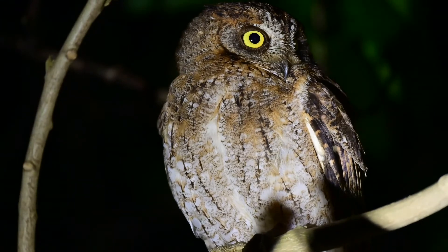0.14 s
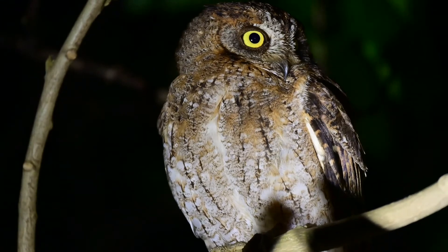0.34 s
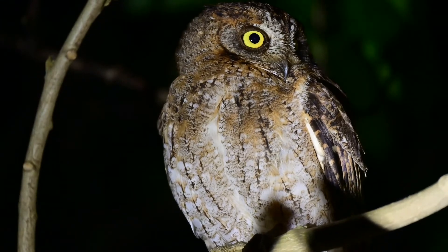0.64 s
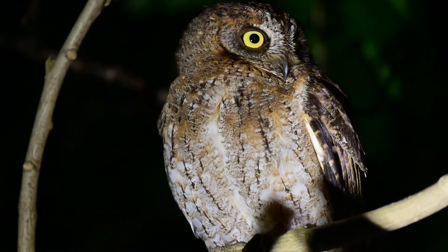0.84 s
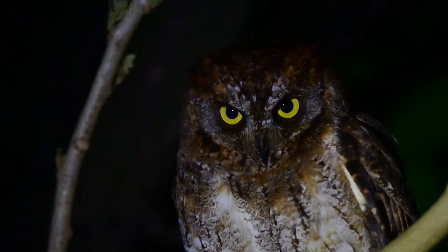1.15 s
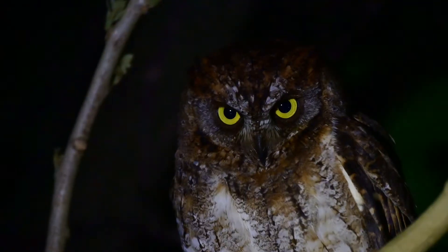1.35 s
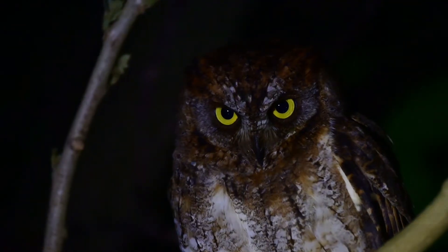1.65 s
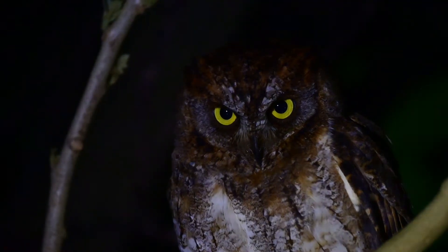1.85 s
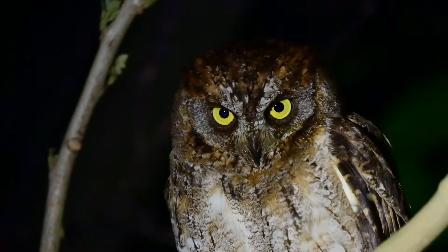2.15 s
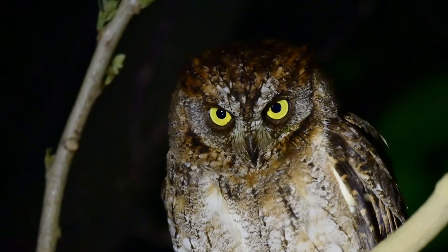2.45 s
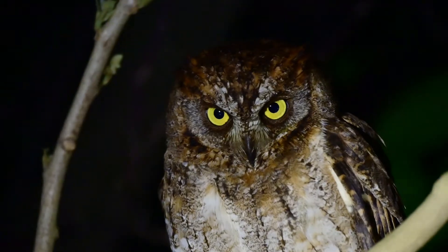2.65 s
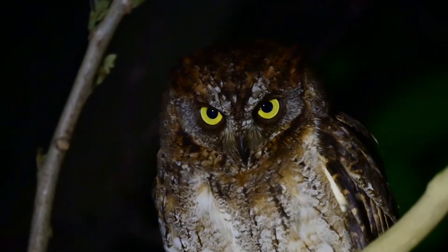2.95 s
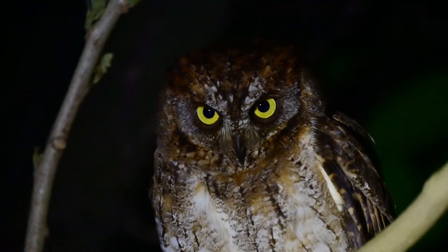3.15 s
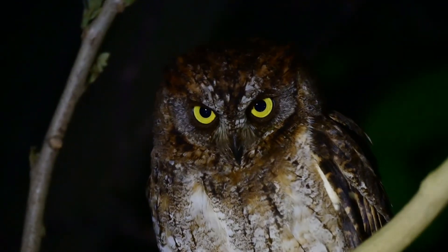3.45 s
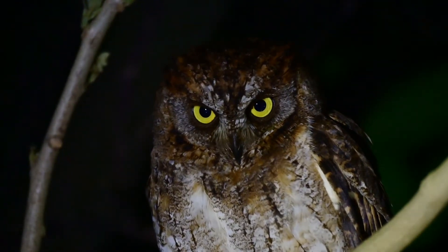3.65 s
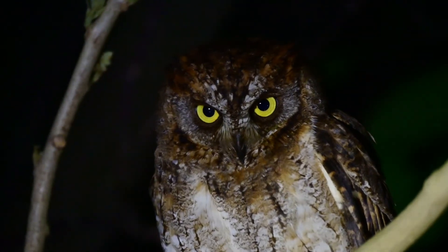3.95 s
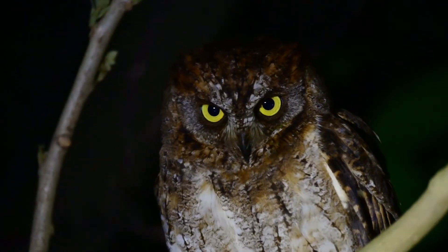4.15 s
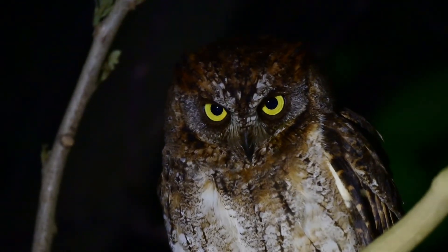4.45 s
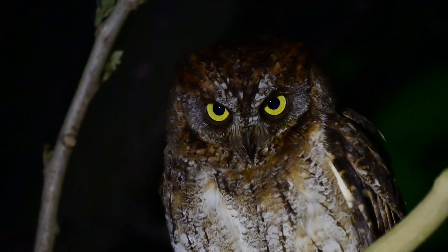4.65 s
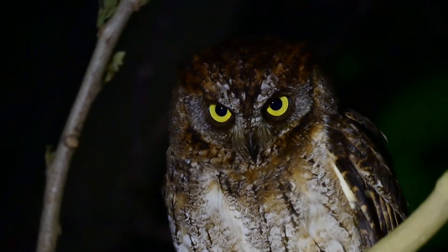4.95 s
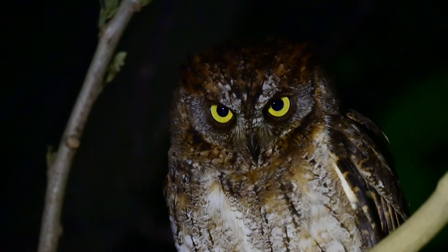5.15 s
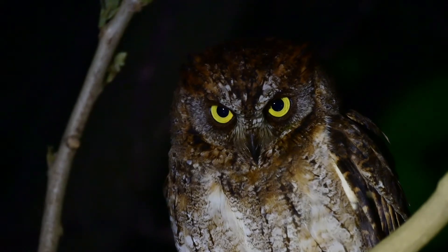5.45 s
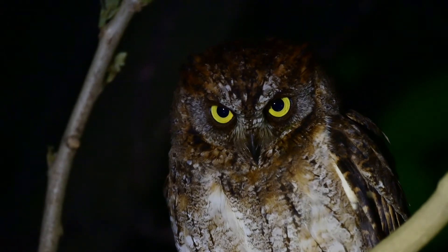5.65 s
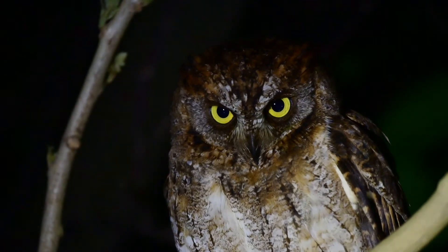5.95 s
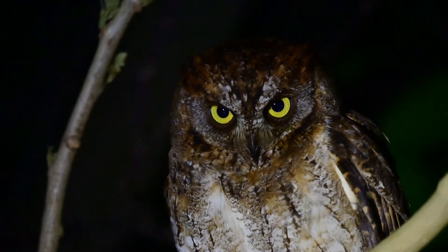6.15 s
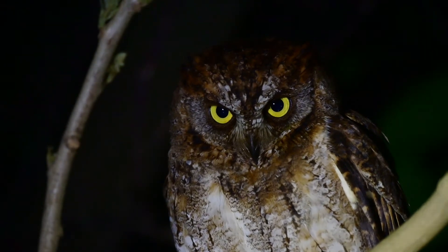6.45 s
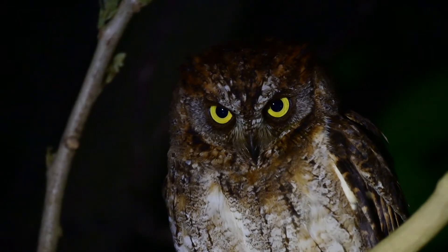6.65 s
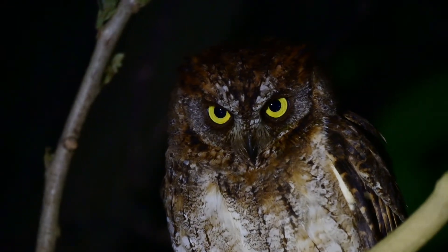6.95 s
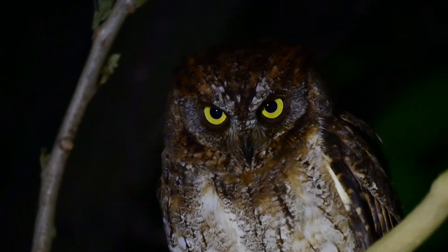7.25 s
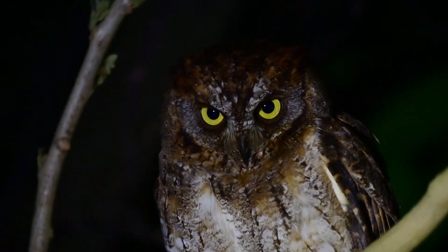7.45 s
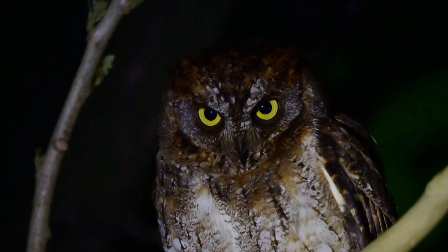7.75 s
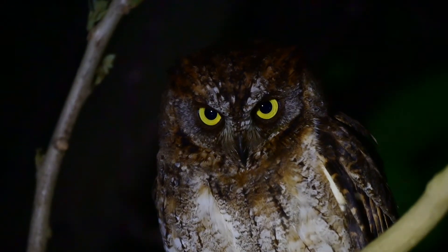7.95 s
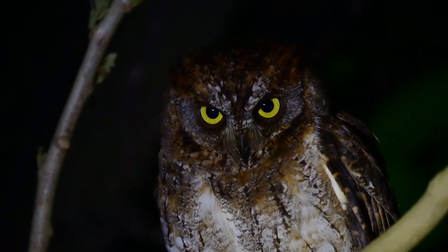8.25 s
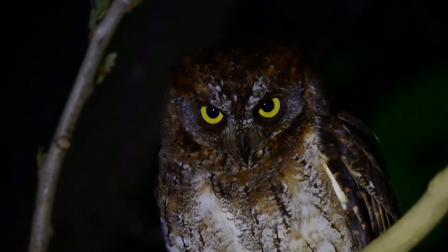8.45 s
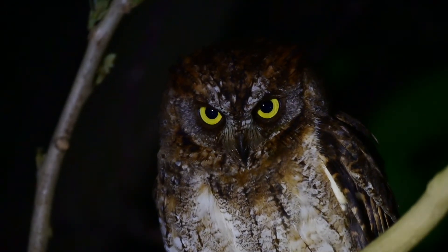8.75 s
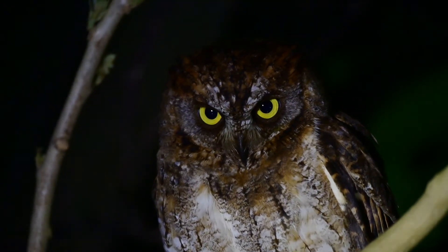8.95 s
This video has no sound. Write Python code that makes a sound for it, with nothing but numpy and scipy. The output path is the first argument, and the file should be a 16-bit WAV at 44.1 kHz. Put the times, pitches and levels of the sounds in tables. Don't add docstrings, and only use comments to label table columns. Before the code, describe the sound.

From 0 to about 0.95 seconds a close stream rushes loudly, mostly on the right, dense with bubbling and a light spray that thins. It cuts almost instantly to a far quieter night wood: soft distant water hiss, faint high cricket chirps in regular quick pulses, and slightly lower trills that come and go. A bright drop snaps on a leaf at 1.15, the loudest at 3.1, a duller one at 8.5, with tiny twig ticks at 1.55 and 4.1. At 3.26 two small owls on the left hoot nearly together, short mellow whistles around 700 to 880 hertz, one gliding gently, the other breaking upward. They repeat at 6.37 and 6.57, overlapping slightly, with echoes off trees. A third owl, very faint, distant and echoing, gives brief hoots near 2.2, 4.5 and 7.3. Crickets and hiss continue to the end, around 9 seconds.

```python
import sys
import numpy as np
from scipy import signal
from scipy.fft import rfft, irfft, next_fast_len
from scipy.io import wavfile
from scipy.ndimage import uniform_filter1d, map_coordinates

SR = 44100
rng = np.random.default_rng(int(sys.argv[2]) if len(sys.argv) > 2 else 0)


def store_wav(level_fs):
    pcm = np.round(np.clip(np.atleast_2d(level_fs), -1, 1) * 32767)
    wavfile.write(sys.argv[1], SR, pcm.T.astype(np.int16))


def field_ratio(decibels):
    return 10 ** (np.asarray(decibels, dtype=float) / 20)


N = 400869
LEFT_RIGHT = np.array([[1], [-1]])


def unit(x):
    return x / np.sqrt(np.mean(x ** 2) + 1e-20)


def along(points, hz):
    f, v = np.transpose(points)
    return np.interp(np.log(hz + 1), np.log(f + 1), v)


def wobble(rate):
    knots = rng.standard_normal(int(N * rate / SR) + 4)
    return map_coordinates(knots, [np.arange(N) * rate / SR])


def filtered(x, response):
    m = next_fast_len(N + SR)
    return irfft(rfft(x, m) * response(np.fft.rfftfreq(m, 1 / SR)), m)[..., :N]


def add(track, s, sound, pan_db):
    part = track[:, round(s * SR):][:, :len(sound)]
    part += field_ratio(LEFT_RIGHT * pan_db / 2) * sound[:part.shape[1]]


def beats(first, last, gap_s, slowing=0):
    u = np.linspace(0, 1, round((last - first) / gap_s) + 1)
    return first + (last - first) * u * (1 - slowing * (1 - u))


def spread(pair, spectrum, alike, pan):
    def mid_and_side(hz):
        turn = np.arccos(np.clip(along(alike, hz), -1, 1)) / 2
        return field_ratio(along(spectrum, hz)) * np.array([np.cos(turn), np.sin(turn)])

    mid, side = filtered(pair, mid_and_side)
    sides = np.array([mid + side, mid - side])
    out = filtered(sides, lambda hz: field_ratio(along(pan, hz) / 2 * LEFT_RIGHT))
    return out / np.std(out.mean(axis=0))


def patchy(depth_db):
    z = signal.stft(rng.standard_normal((2, N)), nperseg=512)[2]
    field = uniform_filter1d(rng.standard_normal(z.shape[1:]), 6, 0)
    field = uniform_filter1d(field, 10, 1)
    return signal.istft(z * field_ratio(depth_db * unit(field)), nperseg=512)[1][:, :N]


def far_water():
    # frequency in Hz, level in dB per Hz.
    night_colour = [(15, -52), (25, -26), (261, -0.5), (412, -1.5), (900, -4.5), (1810, -13), (2510, -13.5),
                    (3030, -16), (3960, -16), (4530, -16), (5190, -13), (5780, -16), (6430, -17.5),
                    (13700, -19.5), (15600, -19)]
    # frequency in Hz, likeness of left and right (1 = same).
    night_alike = [(60, 1), (180, -0.12), (550, 0.37), (1650, 0.29), (4970, 0.15), (15000, -0.082)]
    # frequency in Hz, left minus right in dB.
    night_pan = [(60, 0), (150, 1.5), (380, 6.5), (950, 4.5), (2380, 1), (5980, -0.5), (15000, 0.5)]
    level_db = -69
    gust_db = 0.4 * wobble(4)
    hiss = spread(patchy(depth_db=0.45), night_colour, night_alike, night_pan)
    return field_ratio(level_db + 7.0 + gust_db) * hiss


def stroke(top_hz, fall, length):
    u = np.arange(round(length * SR)) / round(length * SR)
    turns = top_hz * length * u * (1 - fall * u / 2)
    return np.sin(np.pi * u) ** 1.1 * np.sin(2 * np.pi * turns)


def noise_band(centre_hz, width_hz):
    noise = rng.standard_normal((2, N))
    return unit(filtered(noise, lambda hz: np.exp(-((hz - centre_hz) / width_hz) ** 2)))


def trillers():
    # first and last stroke in seconds, final level in dB, slowing from 0 to 1.
    trains = [(1.035, 1.259, -72, .09), (2.4, 2.681, -71.5, .08), (4.433, 4.911, -73.5, .12),
              (5.383, 5.694, -72.5, .26), (6.233, 6.302, -76, 0), (6.666, 6.724, -74.5, 0),
              (7.679, 8.095, -72, .06), (8.761, 8.958, -71, .09)]
    # start in seconds, level in dB.
    strays = [(3.376, -74), (3.47, -77), (3.686, -75), (3.935, -74), (4.317, -72), (6.966, -75),
              (7.261, -72)]
    # start in seconds, pitch in Hz, level in dB.
    pips = [
        (8.655, 4700, -70),
        (8.77, 4800, -64),
        (9.06, 4800, -65),
    ]
    stroke_gap_s = 0.068
    out = np.zeros((2, N))
    strokes = list(strays)
    for first, last, db, slowing in trains:
        for s in beats(first, last, stroke_gap_s, slowing):
            strokes.append((s, db - 4 * (s == first) - 3 * (last - s)))
    for s, db in strokes:
        add(out, s - 0.003, field_ratio(db + 3.5 + rng.normal(0, 0.8)) * stroke(4560, 0.15, 0.04), -1.5)
    for when, tone, pan in rng.random((110, 3)):
        far = field_ratio(-80 + 5 * pan) * stroke(4000 + 500 * tone, 0.099, 0.0295)
        add(out, 1 + 8 * when, far, 8 * pan - 4)
    for s, hz, db in pips:
        add(out, s, field_ratio(db) * stroke(hz * 1.02, 0.04, 0.03), 0)
    chorus = field_ratio(-79.5 + 0.63 * wobble(2.9)) * noise_band(3990, 350)
    chorus += field_ratio(-88 + 2.6 * wobble(5)) * noise_band(5240, 250)
    chorus += field_ratio(-82.5 + 2.5 * wobble(4)) * noise_band(2550, 150)
    u = np.arange(SR // 4) / SR
    leaves = rng.standard_normal((2, len(u))) * field_ratio(-60 * u / 0.35)
    haze = field_ratio(-5) * signal.fftconvolve(out, leaves / np.linalg.norm(leaves[0]), axes=1)[:, :N]
    return out + haze + chorus


def chirper():
    chirp_runs = [(.88, 1.251), (1.67, 4.933), (5.353, 6.784), (7.209, 7.209), (7.647, 7.647),
                  (8.058, 8.779)]
    chirp_gap_s, stroke_gap_s = 0.361, 0.0405
    out, t = np.zeros((2, N)), np.arange(round(0.06 * SR)) / SR
    for s in np.concatenate([beats(*run, chirp_gap_s) for run in chirp_runs]):
        for k, (db, drift) in enumerate(rng.standard_normal((5, 2))):
            level_db = -68.5 + 0.5 * db - 3.3 * (k == 4) - 60 * t / 0.17
            envelope = field_ratio(level_db) * (1 - np.exp(-t / 0.0041))
            for pan_db in (-8, 6):
                blur = np.cumsum(rng.standard_normal(len(t))) * 0.085
                ring = np.sin(2 * np.pi * (5160 + 40 * drift) * t * (1 - 0.45 * t) + blur)
                add(out, s - 0.004 + k * stroke_gap_s, envelope * ring, pan_db)
    return out


def drips():
    # start in seconds, peak in dB, left minus right in dB, plop in dB, snap in dB per kHz over 4 kHz.
    drops = [
        (1.1502, -35.5, -6, -15, 1),
        (3.081, -33, -7, -20, -1),
        (8.484, -36.5, -6, -19, -3),
    ]
    # pitch in Hz, level in dB, time to fall 60 dB in seconds.
    leaf = [(2800, -7, 0.0033), (3930, -0.5, 0.0058), (6100, -2, 0.0026), (7000, -10, 0.0028),
            (9800, -17, .003)]
    # start in seconds, peak in dB, lowest and highest pitch in Hz, left minus right in dB.
    ticks = [
        (1.553, -45.5, 5940, 8060, 5),
        (4.108, -43, 4600, 7700, 5),
    ]
    out, t = np.zeros((2, N)), np.arange(900) / SR
    for s, db, pan_db, plop_db, snap_db in drops:
        ring = np.zeros(len(t))
        for hz, level, t60 in leaf:
            mode_db = level + snap_db * max(hz / 1000 - 4, 0) - 60 * t / t60
            ring += field_ratio(mode_db) * (1 - np.exp(-t * hz / 0.51)) * np.sin(2 * np.pi * hz * t)
        sag = np.cumsum(420 + 1900 * np.exp(-t / 0.00176)) / SR
        plop = field_ratio(plop_db + 8.5 - 60 * t / 0.039) * np.sin(2 * np.pi * sag)
        add(out, s + 0.00088, field_ratio(db - 3.0) * (ring + plop), pan_db)
    for s, db, low_hz, high_hz, pan_db in ticks:
        pitches = np.linspace(low_hz, high_hz, num=5)
        ring = sum(np.sin(2 * np.pi * hz * t + 6 * rng.random()) for hz in pitches)
        add(out, s, field_ratio(db - 4.0 - 60 * t / 0.0076) * (1 - np.exp(-t / 0.0004)) * ring, pan_db)
    return filtered(out, lambda hz: 1j * hz / (1j * hz + 400))


def bubbles(count, centre_hz, cycles, scatter_db):
    when, tone = rng.random((count, 1)), rng.standard_normal((count, 1))
    size = rng.exponential(size=(count, 1))
    hz = np.clip(centre_hz * np.exp(0.42 * tone), 600, 9000)
    turns = hz * np.arange(900) / SR
    grain = field_ratio(scatter_db * size) * np.sin(2 * np.pi * turns * (1 + 0.13 * turns / cycles))
    grain = grain * np.exp(-2.5 * turns / cycles) * (1 - np.exp(-turns / 1.6))
    at = (when * SR).astype(int) + np.arange(900)
    return unit(np.bincount(at.ravel(), grain.ravel(), N)[:N]) * np.sqrt(SR / N)


def stream():
    # time in seconds, flow in dB.
    flow = [(0.0, -29.5), (0.198, -29), (0.246, -28), (0.292, -29), (0.616, -28), (0.75, -29.5),
            (0.95, -30.5)]
    # frequency in Hz, level in dB per Hz.
    rush_colour = [(18, -78), (30, -49), (203, -18.5), (334, -10.5), (642, -10.5), (732, -6.5), (812, -8.5),
                   (1170, -1), (1270, -4), (1830, -3.5), (5080, -16.5), (9270, -28), (12700, -45),
                   (15600, -42)]
    # frequency in Hz, likeness of left and right (1 = same).
    rush_alike = [(60, .7), (150, .8), (280, .75), (550, .55), (1100, .6), (2200, .35), (4500, .5),
                  (8000, .4), (15000, .2)]
    # frequency in Hz, left minus right in dB.
    rush_pan = [(60, 1), (150, -3.5), (380, -12.5), (950, -13.5), (2380, -8.5), (5980, -2), (15000, -1)]
    # frequency in Hz, how far the left leads in radians.
    rush_lead = [(60, 0.5), (180, -1), (430, -1.7), (1100, -.5), (2000, -1.4), (5000, 1.17), (8000, -3.5)]
    spray_db, spray_fade_db_per_s = -40, 5.5
    s, db = np.transpose(flow)
    t = np.arange(N) / SR
    rush = spread(patchy(depth_db=1.02), rush_colour, rush_alike, rush_pan)
    rush = filtered(rush, lambda hz: np.exp(0.5j * along(rush_lead, hz) * LEFT_RIGHT))
    pops = bubbles(count=4000, centre_hz=1301, cycles=8.4, scatter_db=2) * field_ratio([[-8], [3]])
    water = rush + field_ratio(-6.5) * pops
    spray = filtered(water, lambda hz: 1 / (1 + (3800 / (hz + 1)) ** 6))
    body = field_ratio(np.interp(t, s, db) - 1.0) * (water - spray)
    return body + field_ratio(spray_db + 13 - spray_fade_db_per_s * t) * spray


def owl(hoot, throat, calls, paths, wood_db):
    attack_s, release_s, wood_t60_s = 0.023, 0.0092, 1
    s, hz, db = np.transpose(hoot)
    open_db, muted_db, fullest, half = throat
    t, voice = np.arange(round(s[-1] * SR)) / SR, np.zeros((2, N))
    octave = field_ratio(open_db - muted_db * np.exp(-((t - fullest) / half) ** 4))
    breath = np.clip(np.minimum(t / attack_s, (s[-1] - t) / release_s), 0, 1)
    for start, factor, level_db in calls:
        phase = 2 * np.pi * np.cumsum(factor * np.interp(t, s, hz)) / SR
        tone = np.sin(phase) + octave * np.sin(2 * phase)
        add(voice, start, field_ratio(level_db + 3.5 + np.interp(t, s, db)) * breath * tone, 0)

    def trunks(f):
        total = 0
        for delay, left_db, right_db, lag in paths:
            arrival = delay + np.array([[0], [lag]])
            total = total + field_ratio([[left_db], [right_db]]) * np.exp(-2j * np.pi * f * arrival)
        return total

    u = np.arange(SR) / SR
    tail = rng.standard_normal((2, SR)) * field_ratio(-60 * u / wood_t60_s) * (1 - np.exp(-u / 0.019))
    diffuse = signal.fftconvolve(voice, tail / np.linalg.norm(tail[0]), axes=1)[:, :N]
    return filtered(voice, trunks) + field_ratio(wood_db) * diffuse


def far_owl():
    # time in seconds, pitch in Hz, level in dB.
    hoot = [(0, 772, -10), (.02, 804, -3), (.045, 902, -5), (.058, 1014, 1.5), (.075, 880, 2.5),
            (.1, 824, -6)]
    throat = (-30, 0, .05, .05)
    # start in seconds, pitch factor, level in dB.
    calls = [
        (2.19, 1, -62.5),
        (4.49, 0.96, -62),
        (7.315, .92, -65.5),
    ]
    # delay in seconds, left and right in dB, lag of the right in seconds.
    paths = [
        (0, 5.5, -9, .0001),
        (.3, -9, -7, 0.00026),
    ]
    return owl(hoot, throat, calls, paths, wood_db=-5)


def low_owl():
    # time in seconds, pitch in Hz, level in dB.
    hoot = [(0, 671, -6), (.03, 675.4, -4), (.072, 664, -3.5), (.09, 687.5, -2.5), (.13, 702, -3.5),
            (.165, 709, -1.5), (.195, 702.5, -1.5), (.218, 686, -5.5), (.245, 636, -11)]
    throat = (-22, 12, .17, .05)
    calls = [
        (3.273, 1.004, -40.5),
        (6.37, .999, -41),
    ]
    paths = [(0, 0.5, -10, .00002), (.045, -20, -23, .0001), (.09, -22, -20, .0002),
             (.13, -23, -33, 0.00019)]
    return owl(hoot, throat, calls, paths, wood_db=-17.5)


def high_owl():
    # time in seconds, pitch in Hz, level in dB.
    hoot = [(0, 785, -12), (.08, 781, -2), (.095, 785, -20), (.108, 764, -1), (.122, 788, -2.5),
            (.133, 884, -0.5), (.155, 875, -6.5), (.175, 856, 1), (.21, 810, -1)]
    throat = (-21, 17, .17, .09)
    calls = [
        (3.259, 1.001, -42),
        (6.565, .999, -41.5),
    ]
    paths = [(0, 1.2, -12, -0.0013), (.042, -12.5, -9, -0.0037), (.062, -9, -26, 0.015),
             (.087, -6, -15, 0.0028), (.205, -20.5, -15.5, .0002), (.245, -24, -20, 0.00083)]
    return owl(hoot, throat, calls, paths, wood_db=-19)


def scene():
    # start in seconds, length in seconds.
    cut = (0.95, 0.013)
    night = far_water() + trillers() + chirper() + drips()
    night = night + far_owl() + low_owl() + high_owl()
    fade = np.clip((np.arange(N) / SR - cut[0]) / cut[1], 0, 1)
    return (1 - fade) ** 2.6 * stream() + fade * night


def starved(x, under_db, scatter_db):
    hz, t, z = signal.stft(x, SR, window="cosine", nperseg=2048)
    loud = np.sqrt(np.mean(np.abs(z) ** 2, axis=(0, 1)))
    blocks = rng.standard_normal((len(hz) // 40 + 1, len(t) // 2 + 1))
    bands = np.kron(blocks, np.ones((40, 2)))[:len(hz), :len(t)]
    tilt = np.clip(hz / 11000, 0, 1)[:, None] ** 1.5
    step = loud * field_ratio(under_db + scatter_db * bands) * tilt + 1e-12
    rounded = z * np.round(np.abs(z) / step) * step / (np.abs(z) + 1e-12)
    z = np.where(hz[:, None] > 6000, rounded, z)
    return signal.istft(z, SR, window="cosine", nperseg=2048)[1][:, :N]


def band_limit(x):
    return signal.sosfilt(signal.butter(12, 15800, fs=SR, output="sos"), x)


def record(dry):
    mix = starved(dry, under_db=-22, scatter_db=5)
    return band_limit(mix)


dry = scene()
out = record(dry)
store_wav(out)
```